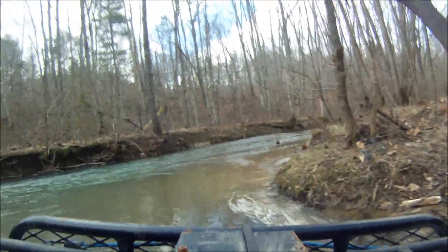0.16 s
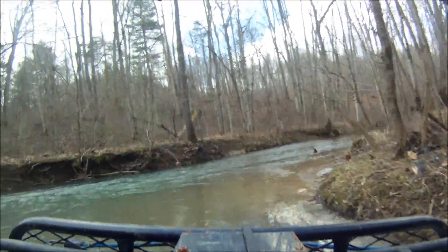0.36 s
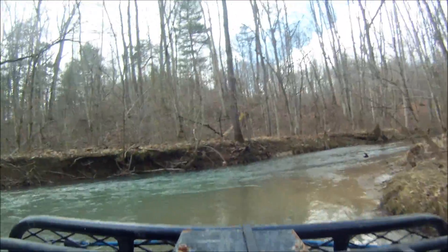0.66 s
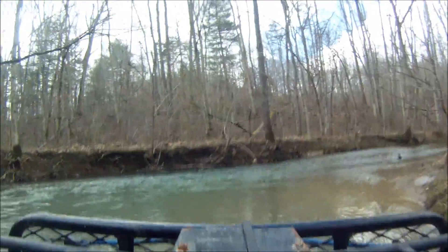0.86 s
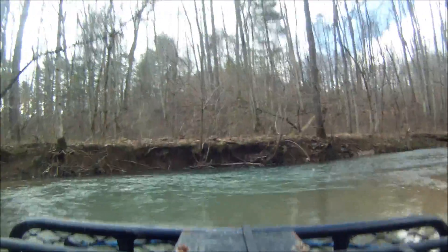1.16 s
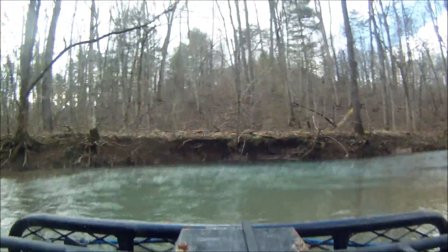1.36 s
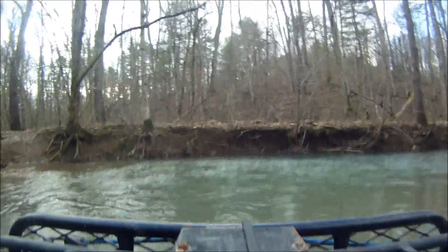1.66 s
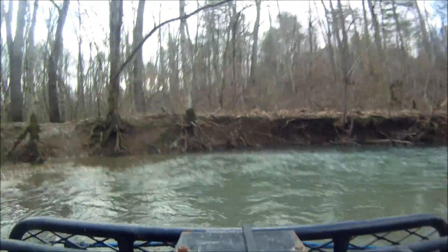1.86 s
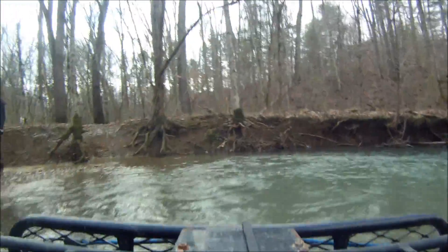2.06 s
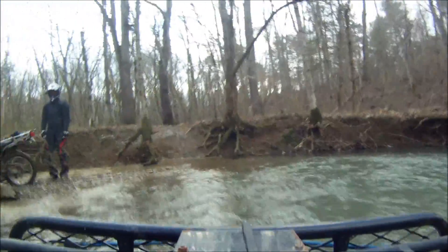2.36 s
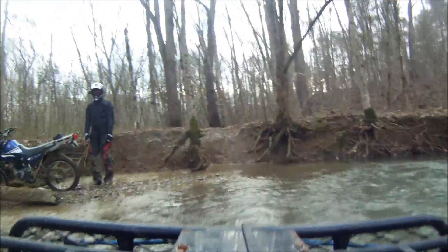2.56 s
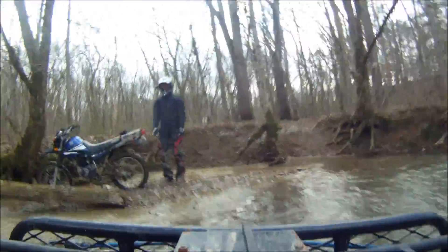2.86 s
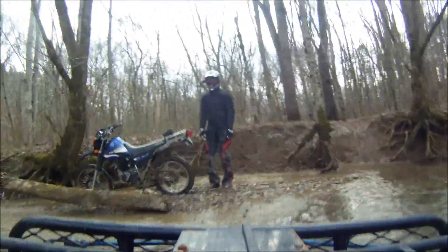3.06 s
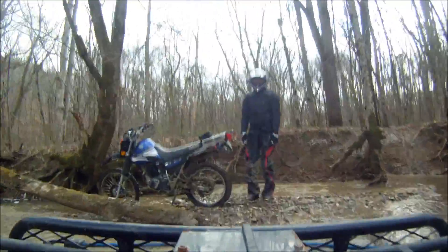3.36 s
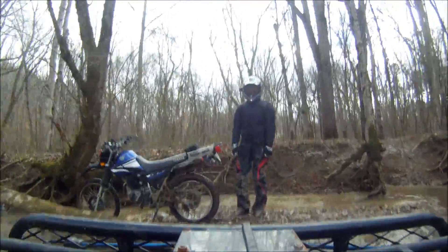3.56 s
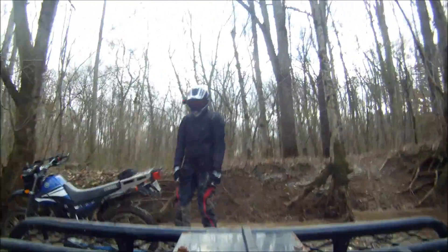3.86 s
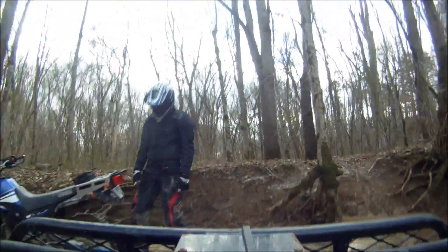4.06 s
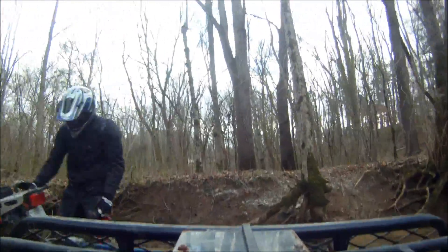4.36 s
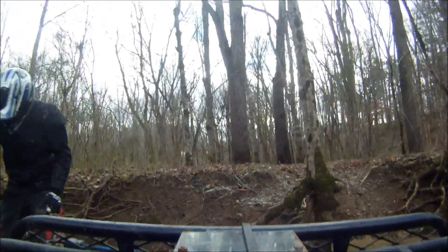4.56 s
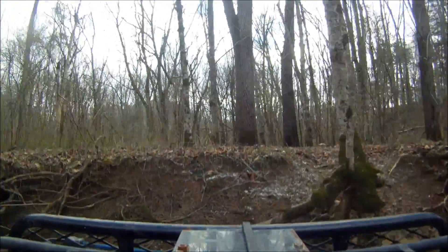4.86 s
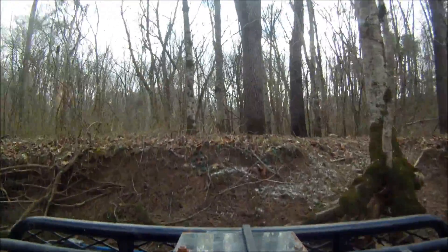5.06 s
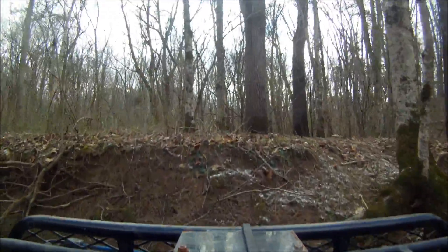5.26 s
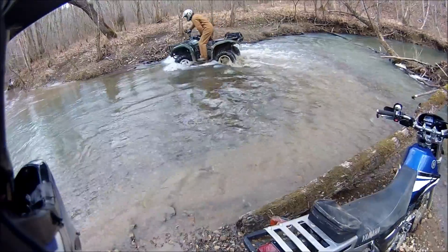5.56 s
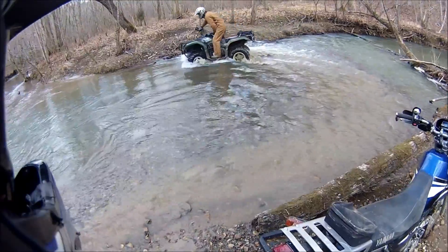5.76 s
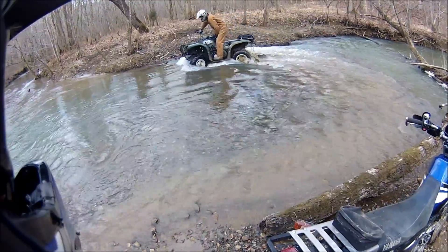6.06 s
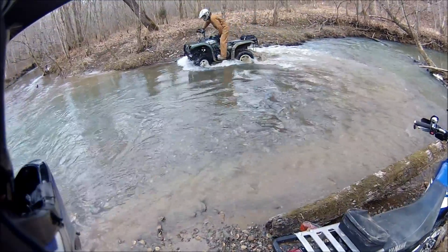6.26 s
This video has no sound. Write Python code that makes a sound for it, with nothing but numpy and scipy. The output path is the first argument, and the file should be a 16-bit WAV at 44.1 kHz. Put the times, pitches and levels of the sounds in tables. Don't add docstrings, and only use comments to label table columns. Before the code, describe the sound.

From 0 to 5.4 seconds the sound is close, nearly mono and muffled by a sealed camera housing on a quad's rack. A deep single-cylinder throb, about 23 firings a second, rises steadily to 29 by 3.8 seconds, with constant metallic rack chatter, fine valve ticks and low water slosh. One knock lands at 0.6; spray swells from about 1.6 to 3.1, with pebble ticks; another knock comes near 3.65. A sharp splash hits around 4.35 as revs fall steeply. From 4.55 the engine lugs, loose tappets tick, a short squeak sounds, and gritty clutch knocks run together from 4.85, slowing slightly. Low jolts and two falling squeaks come at 5.2 to 5.39. Then an abrupt cut: far quieter, from the bank, soft exhaust putters with a short echo and airy puffs quicken until 6.4 over increasingly prominent churning water and a faint, very high whine.

```python
import sys
import numpy as np
from scipy import signal
from scipy.fft import rfft, irfft, next_fast_len
from scipy.io import wavfile
from scipy.ndimage import uniform_filter1d, map_coordinates

SR = 44100
rng = np.random.default_rng(int(sys.argv[2]) if len(sys.argv) > 2 else 0)


def natural_amplitude(level_db):
    exponent = np.asarray(level_db, float) / 20
    return 10 ** exponent


def waveform_to_disk(signal):
    frames = np.transpose(np.atleast_2d(signal))
    scaled = np.clip(frames, -1, 1) * 32767
    samples = np.round(scaled).astype(np.int16)
    wavfile.write(sys.argv[1], SR, samples)


N = 282240
T = np.arange(N) / SR
CHANGE_S = 5.39177
IDLE_HZ = 20


def unit(x):
    return x / np.sqrt(np.mean(x ** 2) + 1e-20)


def along(points, hz):
    f, db = np.transpose(points)
    return natural_amplitude(np.interp(np.log(hz + 1), np.log(f + 1), db))


def curve(rows, s=T):
    return np.interp(s, *np.transpose(rows))


def wobble(rate_hz):
    knots = rng.standard_normal(int(N * rate_hz / SR) + 4)
    return map_coordinates(knots, [T * rate_hz])


def filtered(x, response):
    m = next_fast_len(N + SR // 2)
    return irfft(rfft(x, m) * response(np.fft.rfftfreq(m, 1 / SR)), m)[..., :N]


def resonances(modes):
    def response(f):
        return sum((-1) ** k * natural_amplitude(db) * 1j * f * w / (c * c - f * f + 1j * f * w)
                   for k, (c, w, db) in enumerate(modes))
    return response


def noise():
    return rng.standard_normal(N)


def hiss(spectrum):
    return unit(filtered(noise(), lambda hz: along(spectrum, hz)))


def bursts(rows, rise_s, t60_s):
    swell, t = np.zeros(N + SR), np.arange(SR // 20) / SR
    for s, db in rows:
        swell[round(s * SR):][:len(t)] += natural_amplitude(db - 60 * t / t60_s) * (1 - np.exp(-t / rise_s))
    return swell[:N]


def whine():
    return np.sin(2 * np.pi * 10519.5 * T) * (1 - .9 * (T * 59.94 % 1 < .1))


# f/Hz, level/dB per Hz
CREEK = [(100, -30), (200, -2.5), (320, -3), (560, -6), (900, -12), (1200, -18.5), (1800, -19.5),
         (4500, -39.5), (8000, -46), (12700, -55)]


def creek():
    return hiss(CREEK) * natural_amplitude(0.9 * wobble(15))


# f/Hz, level/dB per Hz
PUFF = [(200, -20), (500, -8), (1800, 1), (2600, -11), (4000, -20), (5500, -16), (8000, -29)]


def puffs(turns):
    breath = np.exp((np.cos(2 * np.pi * (turns - .1)) - 1) / (2 * np.pi * .14) ** 2)
    return hiss(PUFF) * breath * natural_amplitude(2 * wobble(20))


# f/Hz, level/dB
EXHAUST = [(30, -34), (60, -18), (85, -1), (105, -1.5), (150, -2), (190, -12), (260, -7.5), (400, -28),
           (900, -25), (2500, -120)]


def exhaust(turns):
    fire = np.diff(np.floor(turns), prepend=0) * natural_amplitude(.7 * wobble(25))

    def pulse(hz):
        cepstrum = irfft(np.log(along(EXHAUST, hz) + 1e-6))
        k = np.arange(len(cepstrum))
        folded = cepstrum * np.where(k < len(k) // 2, 2, 0)
        causal = np.exp(rfft(folded) - cepstrum[0])
        echo = 1 + .6 * np.exp(-2j * np.pi * hz * .019)
        return causal * echo * (hz > 25)

    pulses = -filtered(fire, pulse)
    return pulses / np.std(pulses[T > CHANGE_S])


# t/s, firing rate/Hz
FAR_SPEED = [(5.43, 20.56), (5.6, 20.59), (5.75, 20.63), (5.9, 22.98), (6.05, 23.76), (6.2, 24.2),
             (6.39, 25.06)]
EXHAUST_DB, PUFF_DB, WATER_DB, WHINE_DB = -53, -63.5, -57, -77
DROWNED_DB_PER_HZ, LOUDER_DB_PER_HZ = .7, .37


def from_bank():
    rate_hz = curve(FAR_SPEED)
    turns = np.cumsum(rate_hz * (T > CHANGE_S)) / SR + .42
    above_hz = rate_hz - IDLE_HZ
    pipe = natural_amplitude(EXHAUST_DB) * exhaust(turns) + natural_amplitude(PUFF_DB) * puffs(turns)
    sound = natural_amplitude(-DROWNED_DB_PER_HZ * above_hz) * pipe
    sound += natural_amplitude(WATER_DB + LOUDER_DB_PER_HZ * above_hz) * creek()
    return filtered(sound + natural_amplitude(WHINE_DB) * whine(), lambda hz: hz < 12750)


# t/s, level/dB
SHAKE = [(0, -30), (.5, -27.5), (.76, -26), (.85, -29), (1.4, -30), (2.41, -29), (2.62, -29.5), (2.72, -30),
         (3.07, -28.5), (3.16, -32), (3.45, -29.5), (4.27, -30), (4.39, -27), (4.57, -30.5), (4.8, -39),
         (5.12, -31), (5.25, -34), (5.39, -31.5)]
CALM_DB = -29.5


def shaking_db(s):
    return curve(SHAKE, s) - CALM_DB


def engine_beat(turns):
    once, four = np.cos(2 * np.pi * (turns - .95)), np.cos(8 * np.pi * turns)
    return natural_amplitude(1.8 * once + .8 * four + .6 * wobble(30))


# f/Hz, level/dB per Hz
HOUSING = [(1800, -6), (3000, -1), (3350, -45), (3650, 4), (4000, 4.5), (4300, 0), (5000, -1), (6000, -35),
           (8000, -120)]


def housing_hiss(beat):
    return hiss(HOUSING) * beat


# f/Hz, level/dB per Hz
SLOSH = [(50, 1), (80, -8.5), (120, -10), (180, -4), (195, -7), (212, -10), (235, 4), (265, -19.5),
         (330, -6), (600, -22.5), (900, -19.5), (1500, -80)]
SLOSH_DB, SLOSH_FOLLOWS = -30.5, 0.22
LABOUR_HZ, LABOUR_DB_PER_HZ, LABOUR_TOP_DB = 14.3, 3, 10


def slosh(rate_hz):
    level_db = SLOSH_DB + SLOSH_FOLLOWS * shaking_db(T) + 0.61 * wobble(4.14)
    level_db += np.clip(LABOUR_DB_PER_HZ * (LABOUR_HZ - rate_hz), 0, LABOUR_TOP_DB)
    return natural_amplitude(level_db) * unit(hiss(SLOSH) * natural_amplitude(1.1 * wobble(14)))


# t/s, length/s, spray level/dB
WADES = [
    (0, .05, -42),
    (.5, 0.17, -47),
    (1.3, 0.18, -40),
    (1.651, 0.93, -35.5),
    (2.675, 0.43, -36.5),
    (3.72, .15, -40),
    (4.342, 0.066, -32.5),
    (5.074, .06, -42),
]
DRIP_DB, SPRAY_RISE_S, SPRAY_FALL_S = -54, .14, .07


def wading():
    gain = natural_amplitude(DRIP_DB)
    for s, length_s, db in WADES:
        rise = (T - s) / SPRAY_RISE_S + 1
        fall = (s + length_s - T) / SPRAY_FALL_S + 1
        gain = gain + natural_amplitude(db) * np.clip(np.minimum(rise, fall), 0, 1) ** 2
    return gain


# f/Hz, width/Hz, level/dB
SPRAY = [(2202, 320, -0.5), (2576, 36, 1.5), (2784, 115, -6)]


def spray(beat):
    mudguards = unit(filtered(noise() * beat ** 1.5, lambda hz: resonances(SPRAY)(hz) ** 2))
    return natural_amplitude(-6.5) * wading() * (mudguards + natural_amplitude(-13.5) * housing_hiss(beat))


# f/Hz, width/Hz, level/dB
RACK = [(355, 138, -6.5), (551, 74, -4), (708.7, 23.5, -3), (885.8, 29.7, 4), (1089, 65.5, -3),
        (1314, 77, -5.5), (1696, 102, -7.5), (1876, 117, -8), (2172, 149, -12), (2650, 19, -30),
        (2647, 20, -17), (3590, 78, -24)]


def rack_chatter(turns, beat):
    shaken = np.diff(np.floor(8 * turns + .35 * wobble(120)), prepend=0).clip(0, 1)
    taps = shaken * natural_amplitude(4.8 * noise()) * np.sign(noise())
    drive = (0.66 * unit(taps) + noise()) * beat
    return natural_amplitude(CALM_DB + shaking_db(T) + 1.05) * unit(filtered(drive, resonances(RACK)))


# t/s, length/s, from f/Hz, to f/Hz, level/dB
SQUEAKS = [
    (4.48, .12, 3600, 3650, -55),
    (5.28, .05, 3500, 3380, -55),
    (5.345, .045, 3420, 3320, -57),
]


def belt():
    out = np.zeros(N)
    for s, length_s, from_hz, to_hz, db in SQUEAKS:
        u = np.clip((T - s) / length_s, 0, 1)
        pitch_hz = from_hz + (to_hz - from_hz) * u + 60 * wobble(150)
        tone = np.sin(2 * np.pi * np.cumsum(pitch_hz) / SR)
        out += natural_amplitude(db + 6.5 * wobble(70)) * np.sin(np.pi * u) ** .5 * tone
    return out


# f/Hz, width/Hz, level/dB
HEAD = [(3620, 200, -4), (4800, 460, 2.5)]


def head(hz):
    return resonances(HEAD)(hz) * along([(5200, 1.5), (6000, -3)], hz)


# share of cycle, peak/dB
TAPPETS = [
    (.2, -41.5),
    (.42, -43.5),
    (.72, -40.5),
    (.95, -47.5),
]
# t/s, peak/dB
PEBBLES = [
    (1.7085, -45),
    (1.932, -40.5),
    (2.324, -35.5),
    (2.365, -38.5),
    (2.5366, -41),
]
LOOSER_DB_PER_HZ = .7


def tappets(turns, rate_hz):
    share, db = np.transpose(TAPPETS)
    cycle = np.arange(np.ceil(turns[-1]))[:, None]
    jitter, spread = rng.standard_normal((2, len(cycle), len(share)))
    s = np.interp(cycle + share + .02 * jitter, turns, T).ravel()
    below_hz = IDLE_HZ - np.interp(s, T, rate_hz)
    peak_db = (db + 2 * spread).ravel() + LOOSER_DB_PER_HZ * (below_hz - 6)
    taps = np.transpose([s, peak_db])[(below_hz > 0) & (s < CHANGE_S)]
    return filtered(3.5 * bursts([*taps, *PEBBLES], rise_s=.0005, t60_s=.022) * noise(), head)


# share of cycle, level/dB
VALVES = [
    (0.202, 16.5),
    (.42, -25),
    (.64, 6.5),
    (0.881, -1),
    (0.942, -7.5),
]
TICK_DB, TICK_FOLLOWS = -53.7, 0.66


def valves(turns, rate_hz, beat):
    seats = 0
    for share, db in VALVES:
        since_s = (turns - share + .01 * wobble(15)) % 1 / rate_hz
        seats = seats + natural_amplitude(db + 2 * wobble(20) - 60 * since_s / .022)
    ticks = unit(filtered(seats * noise(), head)) * (rate_hz > IDLE_HZ)
    return natural_amplitude(TICK_DB + TICK_FOLLOWS * shaking_db(T)) * unit(.9 * ticks + housing_hiss(beat))


# t/s, peak/dB, f/Hz
BUMPS = [
    (5.205, -12, 42),
    (5.244, -14, 40),
    (5.321, -10, 40),
    (5.357, -10.5, 43),
]


def jolts():
    swing, t = np.zeros(N + SR), np.arange(SR // 5) / SR
    for s, db, hz in BUMPS:
        swing[round(s * SR):][:len(t)] = natural_amplitude(db - 60 * t / 0.74) * np.sin(2 * np.pi * hz * t)
    return filtered(swing[:N], lambda hz: (hz > 15) / (1 + (hz / 110) ** 4))


# t/s, peak/dB
KNOCKS = [(0.4988, -38), (0.631, -19.5), (3.6541, -26), (4.56, -23.5), (4.6174, -22), (4.6952, -26.5),
          (4.7232, -21.5), (4.784, -30.5), (5.088, -23), (5.098, -23), (5.3368, -20)]
TRAIN_S, SLAP_GAP_S, SLOWING_S, SLAPS = 4.8424, .0322, .0000315, 13
SLAP_DB, SLAP_FOLLOWS = -17.5, .4


def slaps():
    k = np.arange(SLAPS)
    s = TRAIN_S + SLAP_GAP_S * k + SLOWING_S * k ** 3
    db = SLAP_DB + SLAP_FOLLOWS * shaking_db(s) + rng.standard_normal(SLAPS)
    return np.concatenate([KNOCKS, np.transpose([s, db])]).T


# f/Hz, width/Hz, level/dB
CASE = [(1870, 460, -1.5), (2220, 910, -4.5), (2600, 640, -4), (3780, 170, -15)]
# f/Hz, width/Hz, level/dB
BODY = [(533, 28, 5), (896, 102, 4), (1320, 400, -9)]


def clutch():
    s, db = slaps()
    slack = bursts(zip(s - .002, 0 * db), rise_s=.0001, t60_s=.036)
    pitch_hz = 2280 - 650 * slack + 60 * wobble(250)
    grit = np.cos(2 * np.pi * np.cumsum(pitch_hz) / SR) + .65 * noise()
    ring = bursts(zip(s - .002, db), rise_s=.002, t60_s=.023) * grit
    scrape = bursts(zip(s, db - 11.5), rise_s=.0031, t60_s=.06) * noise()
    thud = bursts(zip(s, db + 3), rise_s=.005, t60_s=.09) * noise()
    case, panels = filtered(ring + scrape, resonances(CASE)), filtered(thud, resonances(BODY))
    return natural_amplitude(16) * case + natural_amplitude(15) * panels


# firing rate/Hz, level/dB
FIRST = [(16, -62), (18.4, -42), (22.7, -33), (24, -28), (26, -23), (28, -23), (29, -25.5)]
SECOND = [(11.4, -30), (12.7, -18), (13.4, -16), (16, -18.5), (22.7, -16), (25, -17), (27.4, -17.5),
          (29, -15.5)]
FOURTH = [(13.6, -34), (15.2, -21), (18.4, -23), (22.7, -40), (25.8, -26), (27.6, -27), (28.05, -32),
          (29, -41)]
FIFTH = [(13, -44), (16.4, -48), (22, -41), (25.8, -31), (27.2, -34), (28, -31.5), (29, -33)]
CANCEL_HZ, CANCEL_WIDTH_HZ = 27, .3


def low_orders(angle, rate_hz):
    first_phase = np.interp(rate_hz, [23, 26, 29], [1.8, .5, -.2])
    fourth_phase = np.interp(rate_hz, [15, 18, 25, 29], [.4, .9, 4, 3])
    cancel = np.tanh(abs(rate_hz - CANCEL_HZ) / CANCEL_WIDTH_HZ)
    low = along(FIRST, rate_hz) * np.cos(angle + first_phase)
    low += along(SECOND, rate_hz) * natural_amplitude(.8 * wobble(20)) * np.cos(2 * angle)
    low += along(FOURTH, rate_hz) * cancel * natural_amplitude(1.5 * wobble(10)) * np.cos(4 * angle + fourth_phase)
    low += along(FIFTH, rate_hz) * natural_amplitude(1.5 * wobble(10)) * np.cos(5 * angle - 2.3)
    return low


# multiple of firing rate, level/dB
UPPER = [(3, -43.5), (6, -36.5), (7, -51), (8, -42), (10, -42), (12, -43)]
# f/Hz, width/Hz, level/dB
FRAME = [(63.8, 13.5, 18.5), (196, 14.5, 11.5), (226.4, 6.4, 4), (372, 38, -3)]
# firing rate/Hz, level/dB
OFF_LOAD = [(17, -6.5), (22, 0)]


def upper_orders(angle, rate_hz):
    high = np.zeros(N)
    for k, order_db in UPPER:
        lift = 0.72 + sum(natural_amplitude(db) / (1 + (2 * (k * rate_hz - c) / w) ** 2) for c, w, db in FRAME)
        phase = rng.uniform(0, 6) + .6 * wobble(7)
        high += natural_amplitude(order_db + 3.5 * wobble(7)) * lift * np.cos(k * angle + phase)
    return along(OFF_LOAD, rate_hz) * high


def engine_orders(turns, rate_hz):
    angle = 2 * np.pi * turns
    return np.sqrt(2) * (low_orders(angle, rate_hz) + upper_orders(angle, rate_hz))


# t/s, firing rate/Hz
SPEED = [(0, 22.71), (0.3, 23.68), (0.6, 25.29), (1, 25.83), (1.4, 26.33), (2.2, 27.77), (2.6, 28.05),
         (3, 28.08), (3.4, 28.63), (3.8, 29.06), (4.05, 28.54), (4.25, 27.71), (4.5, 23.66), (4.6, 18.36),
         (4.7, 16.35), (5, 13.82), (5.15, 13.2), (5.39, 9)]


def on_board():
    rate_hz = curve(SPEED)
    turns = np.cumsum(rate_hz) / SR - .26
    beat = engine_beat(turns)
    water = slosh(rate_hz) + spray(beat)
    loose = rack_chatter(turns, beat) + belt() + jolts() + clutch()
    ticking = tappets(turns, rate_hz) + valves(turns, rate_hz, beat)
    return water + loose + ticking + engine_orders(turns + 0.016 * wobble(18), rate_hz)


def held(x):
    slow = signal.resample_poly(x, 40, 147)
    return signal.resample_poly(np.repeat(slow, 4), 147, 160)[:N]


# f/Hz, level/dB per Hz
APART = [(24, -32), (40, 11), (206, 3), (784, -8.5), (910, -21), (1200, -22.5), (3930, -19.5), (5990, -33),
         (7870, -28), (13900, -46), (15000, -43)]
# f/Hz, level/dB per Hz
PORTS = [(880, -50), (1500, -20), (2910, -7), (4440, -5), (6090, -5.5), (9370, -9), (14000, -19)]


def scene():
    on_rack = T < CHANGE_S
    mid = np.where(on_rack, held(on_board()), from_bank())
    parting = uniform_filter1d(1. * (wobble(30) > .55), size=400)
    side = np.where(on_rack, natural_amplitude(-41.5) * (0.046 + parting) * hiss(APART), natural_amplitude(-92) * hiss(PORTS))
    return np.array([mid + side, mid - side])


def low_pass(x):
    return signal.sosfilt(signal.butter(12, 15570, fs=SR, output="sos"), x)


def record(dry):
    limited = filtered(dry, lambda hz: along([(15300, 0), (15800, -40)], hz))
    return low_pass(limited)


dry = scene()
out = record(dry)
waveform_to_disk(out)
```